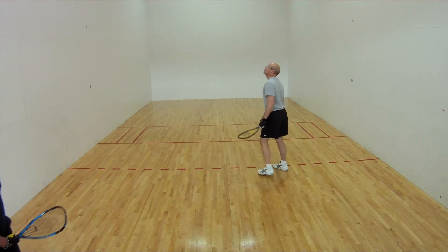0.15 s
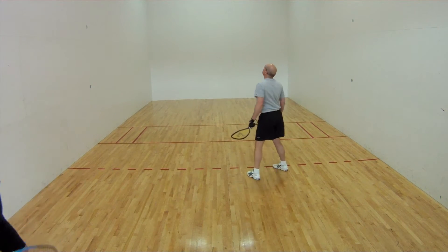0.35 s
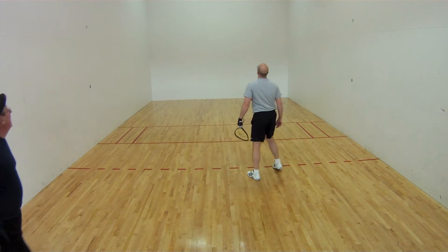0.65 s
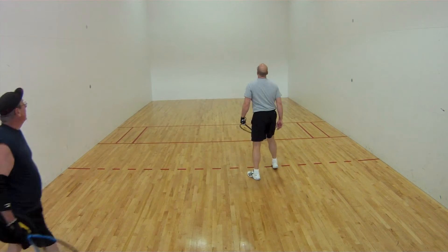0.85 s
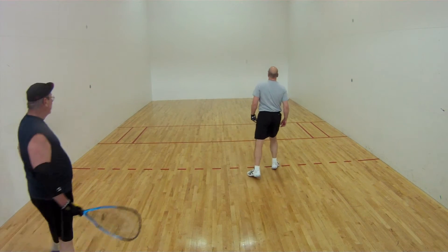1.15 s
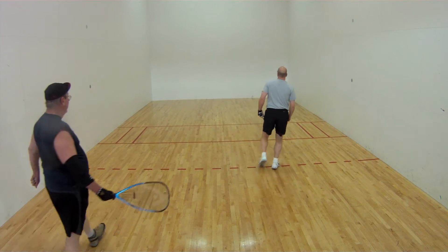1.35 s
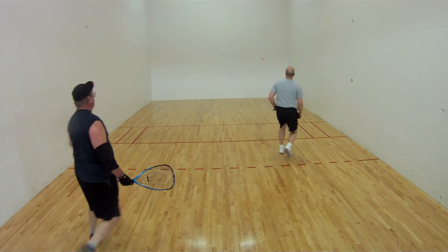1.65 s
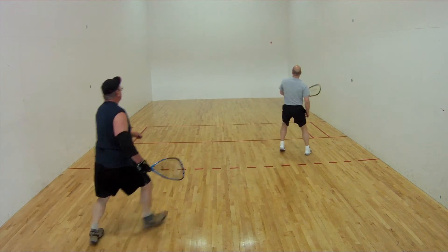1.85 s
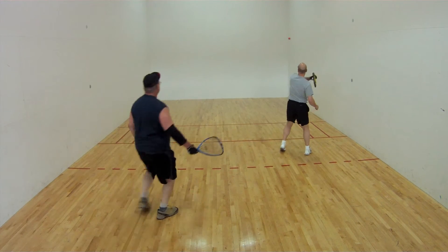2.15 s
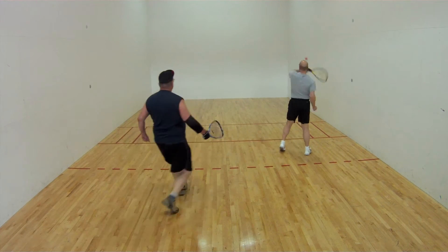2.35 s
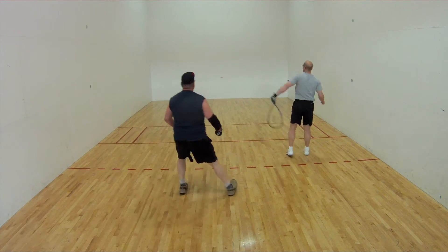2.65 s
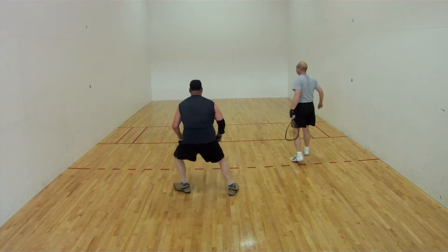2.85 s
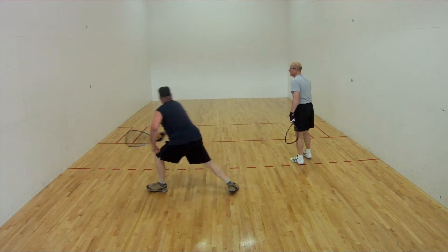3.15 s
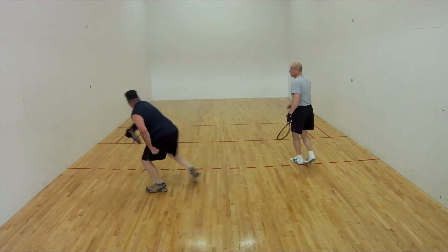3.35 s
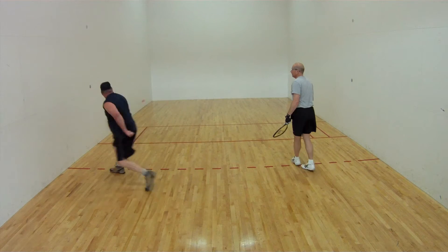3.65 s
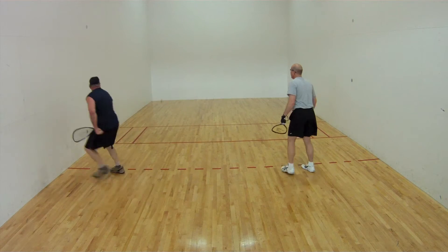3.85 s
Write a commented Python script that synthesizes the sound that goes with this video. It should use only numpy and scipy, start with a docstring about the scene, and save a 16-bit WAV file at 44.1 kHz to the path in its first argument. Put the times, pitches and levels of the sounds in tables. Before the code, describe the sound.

Racquetball impacts in a bare, very reverberant court. At 0 s a heavy footfall booms with low rumble over the ring of an earlier hit. Soles tap from 1.1 to 1.55 s; brief shoe squeaks come at 1.7 and 1.95. A racquet cracks at 2.55, the ball smacks the wall loudly at 2.8, a sharper pinging stroke at 3.65, soft bounce at 3.75, duller smack at 4.0. Faint ventilation hum, glassy treble.

```python
"""A heavy footfall booms over the ring of a ball already struck, in a bare court with a long, hard tail.
Racquet strokes alternate with ball smacks on the front wall: shaped noise cracks with modes and echoes. Shoes
thud as low sines and squeak as wavering whistles; soles and the ball tap and scuff lightly. Filtered noise and
a low hum make the ventilation; a coarse sample-and-hold adds a glassy fizz."""
import sys
import numpy as np
from scipy import signal
from scipy.fft import rfft, irfft
from scipy.io import wavfile
from scipy.ndimage import uniform_filter1d

SR = 44100
rng = np.random.default_rng(int(sys.argv[2]) if len(sys.argv) > 2 else 0)


def waveform_to_disk(signal):
    """Save audio, clipped to [-1, 1], as 16-bit WAV at the path in sys.argv[1]."""
    frames = np.transpose(np.atleast_2d(signal))
    scaled = np.clip(frames, -1, 1) * 32767
    samples = np.round(scaled).astype(np.int16)
    wavfile.write(sys.argv[1], SR, samples)


N = 176400  # four seconds


def amp(db):
    """Turns decibels into gain."""
    return 10 ** (np.asarray(db) / 20)


def read(points, hz):
    """Reads a curve on a log-frequency axis."""
    f, value = np.transpose(points)
    return np.interp(np.log(hz + 1), np.log(f + 1), value)


def unit(x):
    """Scales a sound to energy 1."""
    return x / np.sqrt(np.sum(x ** 2) + 1e-20)


def unit_rms(x):
    """Scales a full-length sound to RMS 1."""
    return unit(x) * np.sqrt(N)


def add(mix, s, sound):
    """Mixes a sound in at a time in seconds, which may lie before the start."""
    at = round(s * SR)
    sound = sound[max(-at, 0):]
    part = mix[max(at, 0):][:len(sound)]
    part += sound[:len(part)]


def causal(gain, size=4096):
    """Minimum phase: the sharpest impulse response with this spectrum, at energy 1."""
    two_sided = np.r_[gain, gain[-2:0:-1]]
    log_gain = np.log(np.maximum(two_sided, 1e-5))
    minimum_phase = np.exp(np.conj(signal.hilbert(log_gain)))
    return unit(np.fft.ifft(minimum_phase).real[:size])


# Spectrum of the air rush: f/Hz, relative level/dB per Hz
AIR_SPECTRUM = [(20, 7.5), (50, -3), (75, -7.5), (120, 0), (170, -3.5), (250, -18.5), (450, -16.5),
                (1000, -17.5), (2200, -22), (4000, -32.5), (6000, -45)]
AIR_DB = -47.5
HUM_HZ, HUM_DB = 115.3, -54.5


def ventilation():
    """Turbulent air is a dull steady rush of filtered noise; a single sine hums under it."""
    gain = amp(read(AIR_SPECTRUM, np.fft.rfftfreq(N, 1 / SR)))
    rush = irfft(rfft(rng.standard_normal(N)) * gain, N)
    hum = np.sqrt(2) * np.sin(2 * np.pi * HUM_HZ * np.arange(N) / SR)
    return amp(AIR_DB) * unit_rms(rush) + amp(HUM_DB) * hum


# How long each band rings between the hard walls: f/Hz, t60/s
COURT_DECAY = [(60, 4), (150, 1.56), (300, 2.7), (1000, 4.1), (2200, 3.95), (3600, 3.02), (5500, 2.24)]


def court(build_s, lumpy_db=1.6, lump_s=0.0046):
    """Diffuse tail: it builds up, arrives in lumps, and each band dies at its own speed."""
    t = np.arange(N) / SR
    lumps = unit_rms(uniform_filter1d(rng.standard_normal(N), max(int(lump_s * SR), 1)))
    # the lumps smooth out as the tail ages
    noise = unit_rms(rng.standard_normal(N) * amp(lumpy_db * lumps / (1 + t)))
    hz, age, bands = signal.stft(noise, SR, nperseg=1024)
    decay = amp(-60 * age / read(COURT_DECAY, hz)[:, None])
    tail = signal.istft(bands * decay, SR, nperseg=1024)[1][:N]
    return tail * np.sqrt(1 - np.exp(-t / build_s))


ECHO_DB = 20  # common lift of the distinct echoes


def impacts(hits, modes, crack, echoes, build_s, smear_s, echo_tilt_db):
    """Blows excite modes over a broad crack, into a diffuse tail and separately tilted distinct echoes."""
    out, hz = np.zeros(N), np.fft.rfftfreq(8192, 1 / SR)
    t = np.arange(SR // 50) / SR
    power = amp(read(crack, hz)) ** 2
    for f, width, db in modes:
        power += amp(db) ** 2 / (1 + ((hz - f) / width) ** 2 * 2) ** 2
    octaves_up = np.log2(np.maximum(hz / 1000, 1))  # treble tilts pivot at 1 kHz
    bass = 1 / (1 + (hz / 600) ** 4)
    for s, db, tilt, bass_db, distinct_db in hits:
        spectrum = np.sqrt(power) * amp(tilt * octaves_up + bass_db * bass)
        add(out, s, amp(db) * signal.fftconvolve(court(build_s), causal(spectrum)))
        blow = causal(spectrum * amp(echo_tilt_db * octaves_up))
        for delay, level in echoes:
            # a short noise burst roughens each echo
            smear = rng.standard_normal(len(t)) * np.exp(-(t / smear_s) ** 2)
            echo = unit(signal.fftconvolve(smear, blow))
            add(out, s + delay, amp(db + ECHO_DB + distinct_db + level) * echo)
    return out


SHUDDER_HZ, SHUDDER_DB, SHUDDER_T60_S = 20.87, -33, 4.4
RUMBLE_HZ, RUMBLE_DB = 44.4, -11  # low-pass edge; level against the shudder sine


def shudder():
    """The structure sways in a slow sine with low rumble, both dying away from the start."""
    t = np.arange(N) / SR
    low_pass = signal.butter(2, RUMBLE_HZ, fs=SR, output="sos")
    rumble = signal.sosfilt(low_pass, rng.standard_normal(N))
    sway = np.sin(2 * np.pi * SHUDDER_HZ * t) + amp(RUMBLE_DB) * unit_rms(rumble)
    return amp(SHUDDER_DB - 60 * t / SHUDDER_T60_S) * sway


# Footfalls: t/s, level/dB, pitch f/Hz
FOOTFALLS = [(-.012, -20, 138.3), (1.488, -34.5, 152.4), (1.715, -40, 100.8), (2.56, -44, 133.6),
             (2.681, -44.5, 86), (3.753, -48, 132)]
# Floor modes under a heel: multiple of the pitch, level/dB
FLOOR_MODES = [(0.719, -12), (1.001, 2), (1.25, -15.5), (1.55, -16.5)]
STEP_RISE_S, STEP_HOLD_S, STEP_FADE_S = 0.01, 0.031, 0.048
STEP_ROOM_DB = -14.5  # court tail against the level of the step


def steps():
    """A heel sets the sprung floor booming for a few cycles, with a softer tail from the court."""
    out, t = np.zeros(N), np.arange(SR // 2) / SR
    fade = np.exp(-np.maximum(t - STEP_HOLD_S, 0) / STEP_FADE_S)
    shape = np.minimum(t / STEP_RISE_S, 1) * fade
    for s, db, hz in FOOTFALLS:
        swing = sum(amp(level) * np.sin(2 * np.pi * hz * multiple * t) for multiple, level in FLOOR_MODES)
        add(out, s, amp(db) * shape * swing)
        push = unit(swing * t * np.exp(-t / 0.0039))
        add(out, s, amp(db + STEP_ROOM_DB) * signal.fftconvolve(court(0.005), push))
    return out


# Light taps and scuffs of soles, and one of the ball: t/s, level/dB, treble tilt/dB per octave, bass/dB,
# distinct echoes/dB
LIGHT_TAPS = [(-.012, -46, -3.5, 9, -7), (1.106, -55, 5.5, 0, 17), (1.3685, -46, -4, 2, 1.5),
              (1.455, -49, -2, 2, -9), (1.497, -43, -2.5, -2, -0.5), (1.55, -47, 1, 4, 1)]
# Modes that ring under the light taps: f/Hz, width/Hz, level/dB
TAP_MODES = [(1050, 186, 1), (1546, 200, -3), (2185, 214, 4.5), (2760, 390, -4.5), (3650, 340, -5)]
# Broad crack of a sole: f/Hz, level/dB
SOLE_CRACK_SPECTRUM = [(30, -21), (200, -6), (450, -14.5), (800, -10.5), (1350, -19), (3200, -13),
                       (4600, -14), (6000, -21)]


def light_taps():
    """Soles and the ball tap and scuff lightly, ringing a few modes; only the direct blow stands out."""
    return impacts(LIGHT_TAPS, TAP_MODES, SOLE_CRACK_SPECTRUM, MID_COURT_ECHOES[:1],
                   build_s=0.0045, smear_s=0.0064, echo_tilt_db=5.5)


# Shoe squeaks: t/s, length/s, first f/Hz, last f/Hz, level/dB, pitch jitter/share
SHOE_SQUEAKS = [(1.693, 0.0348, 3160, 3400, -44, 0.012), (1.711, 0.0724, 3450, 3553, -40, 0.034),
                (1.721, 0.0566, 4336, 4243, -44.5, 0.03), (1.9446, 0.024, 3786, 3564, -36, 0.01),
                (1.956, 0.0475, 3612, 3566, -40, .004), (1.941, 0.012, 5940, 5390, -48.5, 0.027)]
SQUEAK_DIRECT_DB = 32.5  # direct spike added to the court tail
SQUEAK_TAPER = 0.081  # share of the length spent fading in and out


def squeaks():
    """Rubber sticks and slips in a short unsteady whistle that the court holds on to."""
    out = np.zeros(N)
    for s, length, first_hz, last_hz, db, jitter in SHOE_SQUEAKS:
        u = np.linspace(0, 1, int(length * SR))
        waver = uniform_filter1d(rng.standard_normal(SR), 40)[:len(u)]
        glide_hz = first_hz + (last_hz - first_hz) * u
        hz = glide_hz * (1 + jitter * waver / waver.std())
        tone = np.sin(2 * np.pi * np.cumsum(hz) / SR)
        whistle = unit(signal.windows.tukey(len(u), SQUEAK_TAPER) * tone)
        room = court(0.008, lumpy_db=0.8)
        room[0] += amp(SQUEAK_DIRECT_DB)
        add(out, s, amp(db) * signal.fftconvolve(room, whistle))
    return out


# Glancing bounce: t/s, level/dB, treble tilt/dB per octave, bass/dB, distinct echoes/dB
GLANCING_BOUNCES = [(3.743, -33, -9.5, -8, 5.5)]
# Modes of the ball in a soft bounce: f/Hz, width/Hz, level/dB
SOFT_BALL_MODES = [(655, 120, -2.5), (943, 114, 1), (1620, 260, -0.5)]


def glancing_bounces():
    """The ball glances softly off a surface after the stroke, with few modes and little treble."""
    return impacts(GLANCING_BOUNCES, SOFT_BALL_MODES, STRING_CRACK_SPECTRUM, FRONT_WALL_ECHOES[:3],
                   build_s=0.01, smear_s=0.0053, echo_tilt_db=0.0)


# Frame ping on the hard stroke: t/s, level/dB, treble tilt/dB per octave, bass/dB, distinct echoes/dB
FRAME_PINGS = [(3.6465, -40, 1.5, -12, 12)]
# Mode of the racquet frame: f/Hz, width/Hz, level/dB
FRAME_MODES = [(2200, 94, 15)]
# Echoes from near the side wall: delay t/s, level/dB
SIDE_WALL_ECHOES = [(0, 4), (.056, 4), (.064, -2), (.083, 2), (.139, -10.5)]


def frame_pings():
    """The racquet frame pings in one strong narrow mode, with bright echoes."""
    return impacts(FRAME_PINGS, FRAME_MODES, STRING_CRACK_SPECTRUM, SIDE_WALL_ECHOES,
                   build_s=0.033, smear_s=0.002, echo_tilt_db=5.0)


# Racquet strokes: t/s, level/dB, treble tilt/dB per octave, bass/dB, distinct echoes/dB
RACQUET_STROKES = [(-.3, -29.5, -3, -4, -6), (2.539, -34.5, -2, -5.5, -.5), (3.6425, -29.5, 1, 4.5, -1.5)]
# Modes of the strings with the ball on them: f/Hz, width/Hz, level/dB
STRING_MODES = [(770, 160, 1), (974, 144, 4.5), (1056, 31, 7), (1583, 285, -10.5), (2180, 196, -3.5),
                (2785, 260, -9.5), (3750, 220, -14.5)]
# Broad crack of the strings, also under the ping and the bounce: f/Hz, level/dB
STRING_CRACK_SPECTRUM = [(30, -20), (130, -17.5), (300, -9), (450, -26), (1300, -33), (2500, -16.5),
                         (4400, -20.5), (5500, -20.5), (6000, -37)]
# Echoes of a source in mid-court, the first also for the light taps: delay t/s, level/dB
MID_COURT_ECHOES = [(0, 6), (0.027, 4), (.041, 6), (0.045, 8.5), (.072, -4), (0.103, -4), (.118, -5),
                    (0.162, 5)]


def racquet_strokes():
    """Strings loaded by the ball ring their modes over a broad crack, with dulled echoes."""
    return impacts(RACQUET_STROKES, STRING_MODES, STRING_CRACK_SPECTRUM, MID_COURT_ECHOES,
                   build_s=0.036, smear_s=0.0087, echo_tilt_db=-2.5)


# Ball on the front wall: t/s, level/dB, treble tilt/dB per octave, bass/dB, distinct echoes/dB
BALL_HITS = [(-.05, -33.5, 0.5, -5, -13), (2.8186, -23.5, -1.3, -1.5, 0.5), (3.9935, -26.5, -4.5, -2, 2)]
# Modes of the ball: f/Hz, width/Hz, level/dB
BALL_MODES = [(247, 86, -5.5), (708, 250, -7), (1043, 153, -1), (1545, 140, -7), (2191, 128, -2.5),
              (2724, 240, -13), (3035, 68, -10), (3650, 345, -13.5)]
# Broad crack of the ball: f/Hz, level/dB
BALL_CRACK_SPECTRUM = [(30, -28), (130, -14.5), (450, -14.5), (1300, -18), (1900, -14), (3300, -20),
                       (4400, -27.5), (5500, -24.5), (6000, -44.5)]
# Echoes of a source at the front wall, the first three also for the bounce: delay t/s, level/dB
FRONT_WALL_ECHOES = [(0, 3.5), (.004, -0.5), (.013, -2.5), (0.024, -1.5), (0.049, -26), (.072, 1.5),
                     (.079, 1), (0.098, -8), (.122, -6), (0.147, -3)]


def ball_on_wall():
    """The ball smacks the front wall and rings its own modes, with bright echoes."""
    return impacts(BALL_HITS, BALL_MODES, BALL_CRACK_SPECTRUM, FRONT_WALL_ECHOES,
                   build_s=0.015, smear_s=0.0057, echo_tilt_db=4.0)


def scene():
    """Mixes ventilation, shoes and floor, racquets and ball."""
    shoes = shudder() + steps() + light_taps() + squeaks()
    rally = glancing_bounces() + frame_pings() + racquet_strokes() + ball_on_wall()
    return (ventilation() + shoes + rally)[None]


HOLD_HZ, EDGE_HZ = 12000, 15500  # sample-and-hold rate; upper band limit


def record(dry):
    """Coarse sampling with held values mirrors the sound into the treble; a low-pass limits the band."""
    coarse = signal.resample(dry[0], N * HOLD_HZ // SR)
    held = signal.resample(np.repeat(coarse, 4), N)
    low_pass = signal.firwin(511, EDGE_HZ, window=("kaiser", 9), fs=SR)
    return signal.oaconvolve(held, low_pass, "same")[None]


dry = scene()
out = record(dry)
waveform_to_disk(out)
```